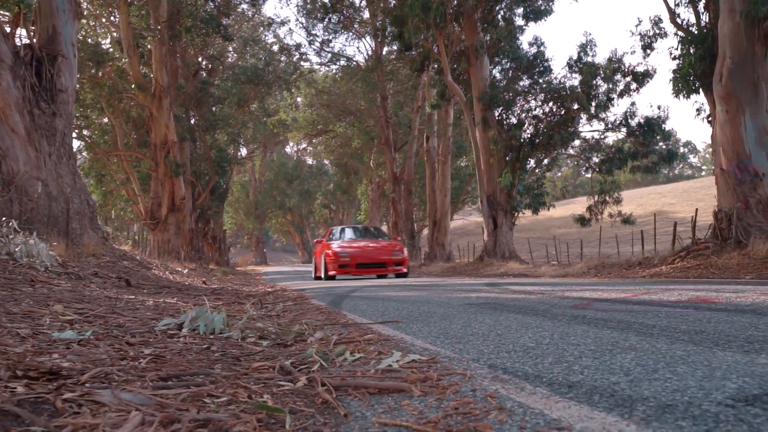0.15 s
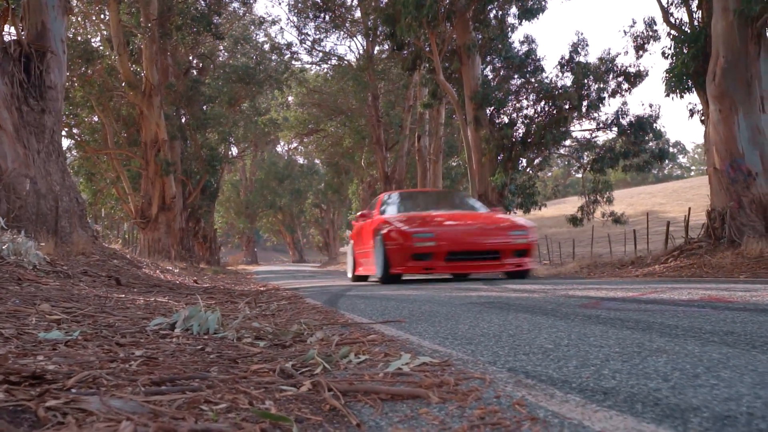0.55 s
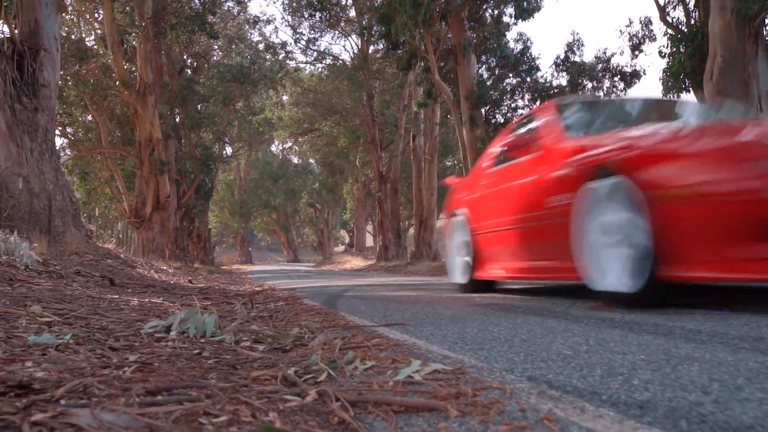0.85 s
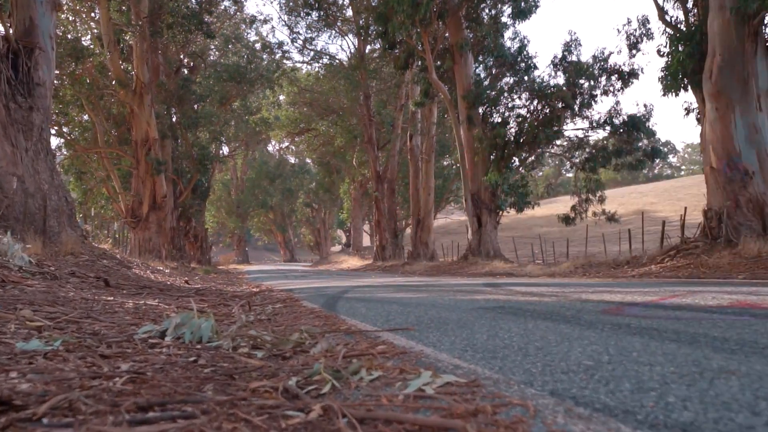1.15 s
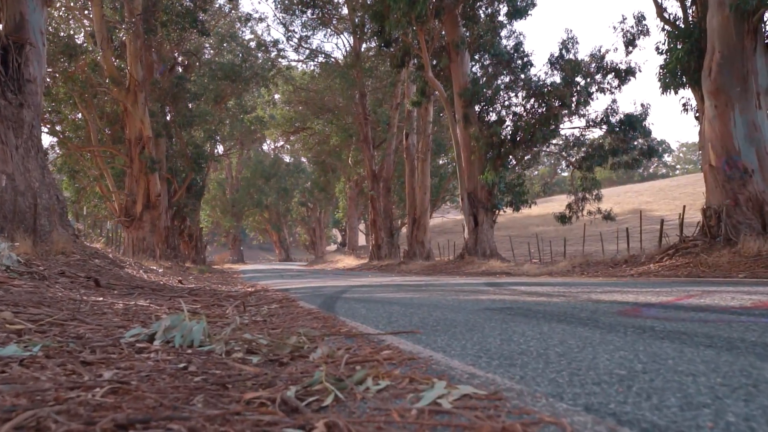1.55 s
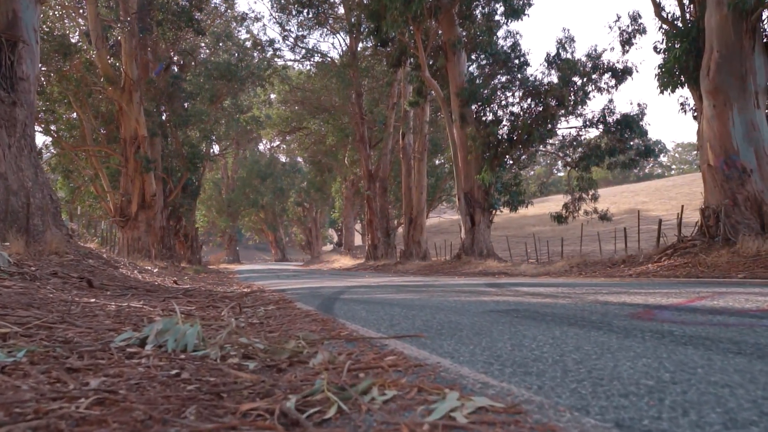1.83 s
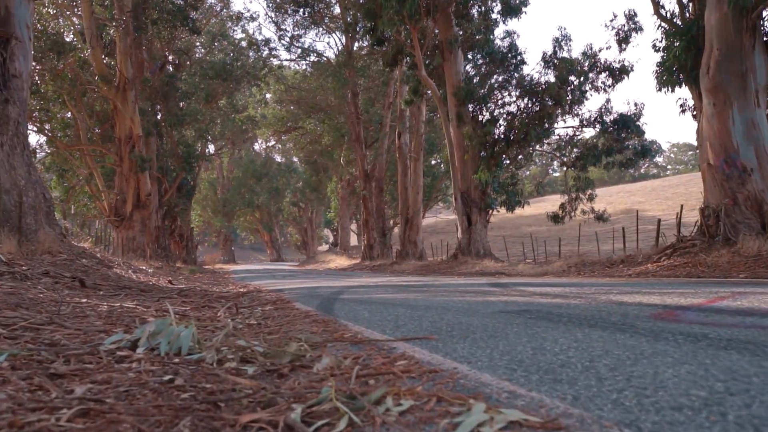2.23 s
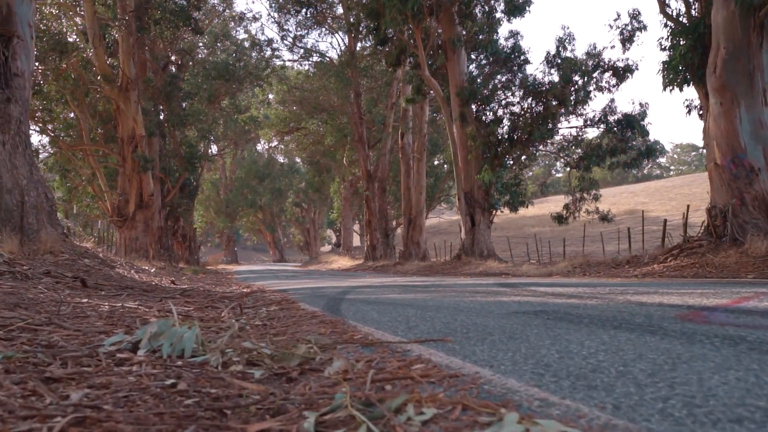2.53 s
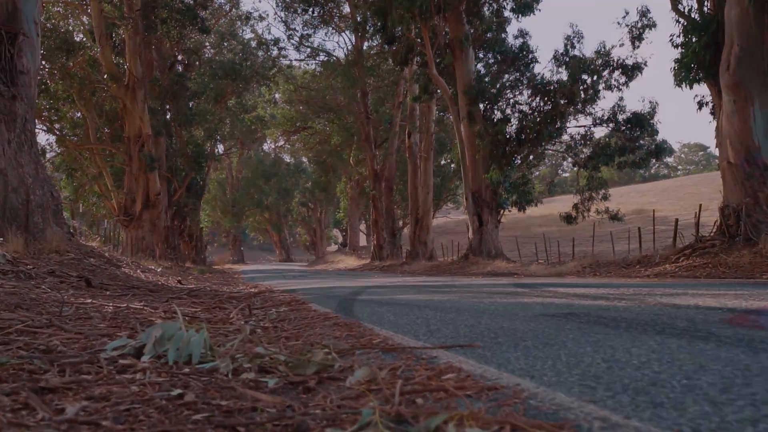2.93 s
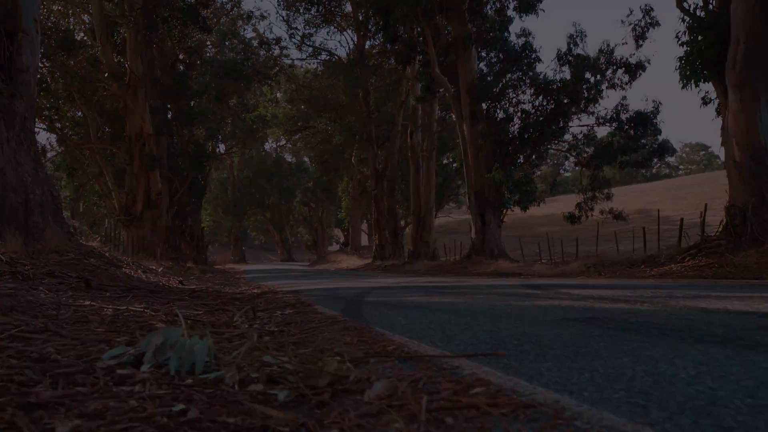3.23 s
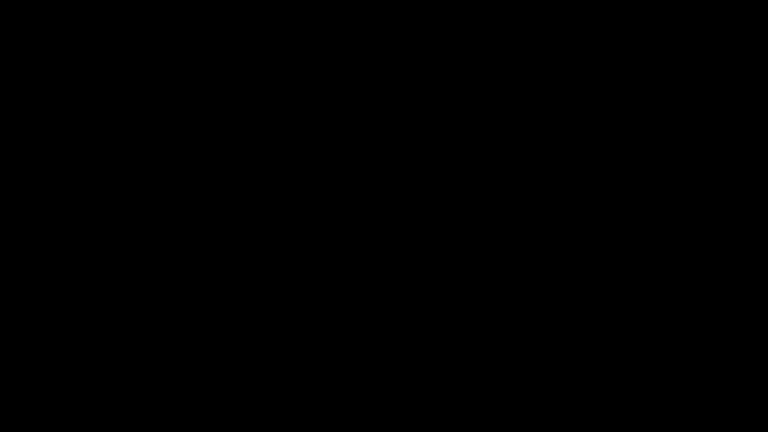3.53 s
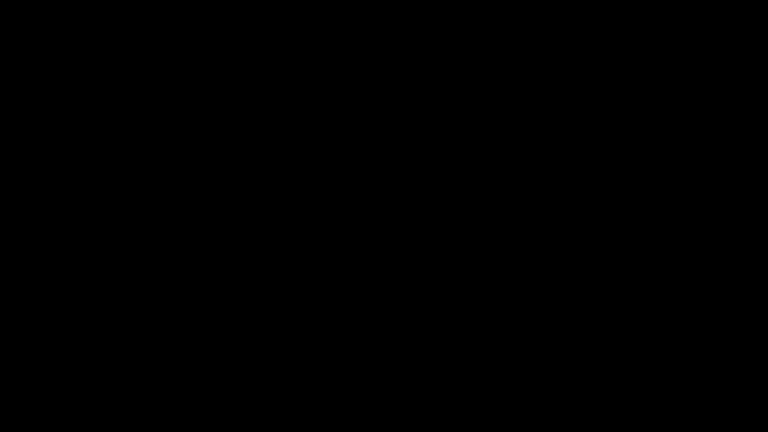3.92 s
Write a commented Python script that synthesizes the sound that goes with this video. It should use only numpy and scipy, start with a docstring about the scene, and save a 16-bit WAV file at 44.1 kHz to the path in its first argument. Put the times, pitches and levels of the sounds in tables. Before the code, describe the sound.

Stereo microphones low on a leafy verge catch a car speeding by: pulsing low exhaust, ringing tread noise and a burst of bright tyre hiss at the pass. The raspy exhaust follows, echoing among trunks, until the throttle closes near two seconds and it becomes softer and duller. Irregular wind buffets bump the microphones, strongest near three seconds, before near quiet.

```python
"""On the verge of a tree-lined country road, a rotary-engined sports car passes and eases off into the distance.
The exhaust is built from sine drones, a pulse-like stack of orders and puffs of noise, echoed by the trunks.
The tyres are coloured noise: a roar with a ringing tread and a bright hiss, shaped by distance.
Low noise rumbles with the road and the wake; noise gusts and thumps are air striking each microphone.
Leaves crackle in flurries, chips of grit tick, and a faint noise bed is the still air."""
import sys
import numpy as np
from scipy import signal
from scipy.fft import rfft, irfft
from scipy.io import wavfile
from scipy.ndimage import uniform_filter1d, map_coordinates

SR = 44100
rng = np.random.default_rng(int(sys.argv[2]) if len(sys.argv) > 2 else 0)


def persist_wave(psi):
    """Save psi, clipped to +-1, as 16-bit WAV."""
    counts = np.round(np.clip(psi, -1, 1) * 32767).astype(np.int16)
    wavfile.write(sys.argv[1], SR, np.atleast_2d(counts).T)


N = 179575
TIME = np.arange(N) / SR

SOUND_M_S = 343
SPEED_M_S, KERB_M = 15, 2.2  # the car's speed, and how near it comes
NOSE_S, MIDDLE_S, TAIL_S = 1.02, 1.19, 1.25  # when the front tyres, the body and the tailpipe draw level
BEND_S, BEND_DB_PER_S, BEND_LOSS_DB = 2.62, 22, 21  # far off, the car slips out of earshot round a bend

# the two rotors fire in turn; the engine pulls, holds and coasts down. Columns: time_s, firing_hz (at the car)
FIRING_RATE = [(0, 151.8), (.22, 151.7), (1.08, 166.8), (1.88, 167.2), (2.45, 157.3), (3.2, 136.6),
               (4.07, 124.4)]
# orders of the rasp; the half orders come from the two rotors being unequal.
# Columns: order (multiple of the firing rate), level_db (relative)
RASP_ORDERS = [(1.5, 1), (2.5, -6.5), (3, 5.5), (3.5, -10.5), (4, -2), (4.5, -9), (5, -2), (5.5, -12),
               (6, -2.5), (6.5, -32), (7, -8), (7.5, -31), (8, -9), (9, -32.5), (10, -33), (11.5, -29),
               (12, -13.5)]
# centre of the band of rasp reinforced by its bounce off the road. Columns: time_s, peak_hz
BOUNCE_PEAK = [(1.25, 940), (1.5, 752), (1.75, 623)]
WANDER, WANDER_PER_S = .003, 14  # share by which the firing rate wavers, and how fast


def exhaust():
    """Each firing sends a steep pressure pulse down the pipe, followed by a puff of gas."""
    receding_m_s = SPEED_M_S * (2 * behind(TAIL_S) - 1)
    doppler = 1 + receding_m_s / SOUND_M_S
    firing_hz = curves(FIRING_RATE)[0] * (1 + WANDER * walk(WANDER_PER_S)) / doppler
    drone_db, octave_db, rasp_db = exhaust_levels()
    peak_hz, = curves(BOUNCE_PEAK)
    cycle = np.cumsum(firing_hz) / SR + 0.002 * walk(140)  # no two firings are timed quite alike
    angle = 2 * np.pi * cycle

    drone = np.sqrt(2) * np.sin(angle) * undb(drone_db + 0.46 * walk(60))
    octave = np.sqrt(2) * np.sin(2 * angle) * undb(octave_db + 1.2 * walk(60))
    rasp = 0
    for order, db in RASP_ORDERS:
        lift_db = 7.6 * np.exp(-((order * firing_hz - peak_hz) / 130) ** 2)
        rasp = rasp - undb(db + lift_db) * np.cos(order * angle)  # all orders crest together in one sharp pulse
    rasp = unit(rasp) * undb(1.4 * walk(150))

    puffs = unit(np.exp(-(cycle % 1) / 0.42) * rng.standard_normal(N))
    gas = colour(puffs, [(500, -15.5), (1000, -2.5), (1400, -5.0), (2400, 0.0), (3300, -16), (6000, -26.5)])[0]
    overtones = octave + (rasp + undb(-13.5) * gas) * undb(rasp_db)

    # on the approach the tailpipe faces away, so more of its rasp arrives by way of the nearest trunks
    echo_db = np.interp(TIME, [1.0, 1.25], [-4, -22])
    near_echo = trees(overtones * undb(echo_db), t60=0.63)
    # the boom lingers longer in the avenue
    avenue_echo = undb(-15.5) * trees(drone, t60=0.69)
    return drone + overtones * panned(-2.5 / distance(TAIL_S)) + near_echo + avenue_echo


# boom of the tailpipe at the firing rate, before the dips and the beat; near 3.77 s a wind buffet
# swells the same band. Columns: time_s, level_db
BOOM = [(1.06, -8), (1.2, -12.5), (1.52, -9), (1.79, -18), (1.88, -24.5), (1.99, -19), (2.07, -23),
        (2.38, -23.5), (2.73, -16), (2.86, -28), (2.98, -24), (3.73, -49.5), (3.77, -40), (4.07, -42)]
APPROACH_DB, SWELL_S, SWELL_DB = -3, 0.16, 9  # the boom's trim on the approach, and its opening swell
BEAT_HZ, BEAT_CREST_S, BEAT_DB = 9.71, 0.4184, -9.5  # an echo with another Doppler shift beats against it
LIFT_S, LIFT_LENGTH_S = 1.895, 0.0097  # the driver lifts off the throttle


def exhaust_levels():
    """Boom, octave and rasp in dB: each dips as the car draws level; closing the throttle cuts the overtones."""
    closed = .5 + .5 * np.tanh((TIME - LIFT_S) / LIFT_LENGTH_S)
    ahead = 1 - behind(NOSE_S)
    beat = np.abs(1 + ahead * undb(BEAT_DB) * np.exp(2j * np.pi * BEAT_HZ * (TIME - BEAT_CREST_S)))

    drone_db = curves(BOOM)[0] + APPROACH_DB * ahead + 20 * np.log10(beat)
    drone_db = drone_db - SWELL_DB * np.maximum(1 - TIME / SWELL_S, 0)
    drone_db = drone_db - 12 * around(.96, width_s=0.069) - 13 * around(LIFT_S, width_s=0.013)

    octave_db = -14.0 + passing_db(TAIL_S, falloff=0.55, rear_db=-1.4) - 18 * closed
    octave_db = octave_db - 22 * around(1.045, width_s=0.071)
    octave_db = octave_db - 8 * np.maximum(1 - TIME / 1.07, 0)  # it builds as the throttle opens

    rasp_db = -20.5 + passing_db(TAIL_S, falloff=0.94, rear_db=4.0) - 8.7 * closed
    rasp_db = rasp_db - 10 * around(1.143, width_s=.06)
    return drone_db, octave_db, rasp_db


# colour of the tread roar. Columns: pitch_hz, level_db (relative)
ROAR_COLOUR = [(200, 3), (280, -3.5), (420, -3), (580, -7), (740, -6), (950, -6), (1200, -5), (1500, -7.5),
               (1900, -10), (2200, -15.5), (2750, -17.5), (3400, -25.5), (6000, -35.5), (15000, -68.5)]
# colour of the bright tyre hiss. Columns: pitch_hz, level_db (relative)
TYRE_HISS_COLOUR = [(1500, 14), (3000, 12), (4500, 8), (6500, 4), (9000, 1), (12000, -5), (15500, -10.5)]
# air ringing in the tread grooves, masked while the car is alongside. Columns: time_s, level_db (beside the roar)
GROOVE_RING = [(0, -6.5), (.7, -11), (.92, -8), (1.15, -31), (2.1, -9)]
# the wedge between each tyre and the road beams its roar at the listener. Columns: crest_s, boost_db
TYRE_HORNS = [(.96, 3), (1.121, 6)]
AIR_LOSS_DB_PER_M = 0.24  # the tyres sound duller as they move off, the air absorbing treble


def tyres():
    """Tread roar with a ringing groove resonance that falls at the pass, and a brighter hiss; both lean right."""
    horn_db = sum(db * around(s, width_s=0.075) for s, db in TYRE_HORNS)
    roar_db = -12.5 + passing_db(NOSE_S, falloff=0.54, rear_db=-10.0) + horn_db
    hiss_db = -29.5 + passing_db(MIDDLE_S, falloff=0.98, rear_db=-8) + 0.47 * horn_db
    nearness = 1 / distance(MIDDLE_S)

    ring_db, = curves(GROOVE_RING)
    ring = resonance(rng.standard_normal(N), hz=1207.0, width_hz=210) * undb(ring_db)
    tread = colour(stereo_noise(apart_hz=4900, side_db=-30), ROAR_COLOUR) + ring
    pitch_drop = .11 * behind(NOSE_S)
    roar = delayed(tread, np.cumsum(pitch_drop))  # a growing lag lowers the pitch

    dull = signal.sosfiltfilt(signal.butter(2, 1700, fs=SR, output="sos"), roar)
    air_loss_db = AIR_LOSS_DB_PER_M * KERB_M * distance(NOSE_S) * behind(NOSE_S)
    roar = dull + (roar - dull) * undb(-air_loss_db)
    roar = roar * undb(roar_db + 1.17 * walk(70)) * panned(-5.5 * nearness)
    hiss = colour(stereo_noise(apart_hz=9000, side_db=-9.0), TYRE_HISS_COLOUR)
    hiss = hiss * undb(hiss_db) * panned(-8 * nearness)

    # just behind the car, the bounce off the road cancels a band that rises with distance
    bounce = undb(-2.5) * swell(1.34, rise_s=.09, fall_s=0.094)
    notch_hz = 3300 * distance(TAIL_S) ** .55
    direct = roar + hiss
    return (direct + bounce * delayed(direct, SR / (2 * notch_hz))) / np.hypot(1, bounce)


# colour shared by the road rumble and the wake rumble. Columns: pitch_hz, level_db (relative)
LOW_RUMBLE_COLOUR = [(20, -30), (40, -13.5), (60, -7.5), (110, -2), (200, -3), (300, -2), (600, -35.5)]
# the whole body of moving air; its level is before the rumble's own gain
WAKE_S, WAKE_RISE_S, WAKE_FALL_S, WAKE_RUMBLE_DB = 2.75, 1.05, 0.52, -40


def rumble():
    """Low road rumble while the car approaches, then the rumble of its wake, as unrelated noise on each side."""
    road_rumble = undb(-34.5) * (1 - behind(NOSE_S)) ** 2
    wake_rumble = undb(WAKE_RUMBLE_DB) * swell(WAKE_S, WAKE_RISE_S, WAKE_FALL_S)
    noise = colour(rng.standard_normal((2, N)), LOW_RUMBLE_COLOUR)
    return noise * (road_rumble + wake_rumble) * undb(11.5 + 3.8 * walk(18)) * panned(-6.5)


# gusts on the microphones: the bow wave ahead of the car, then its wake.
# Columns: crest_s, level_db (relative), left_minus_right_db, rise_s, fall_s
AIR_GUSTS = [(.95, -25.5, 0.5, 0.44, 0.097), (1.92, -27, -8, 0.037, 0.025), (2.439, -29.5, 16, 0.11, 0.053),
             (2.83, -23, -6, 0.12, 0.061), (2.98, -30.5, 8, .05, 0.071), (3.43, -34.5, 7, 0.057, 0.067),
             (3.773, -33, -27, .015, 0.016)]
# colour of the small eddies. Columns: pitch_hz, level_db (relative)
SMALL_EDDY_COLOUR = [(30, -34), (80, 2.5), (200, -0.5), (380, 1.5), (600, -6.5), (950, -26), (1500, -33),
                     (2800, -61), (5000, -53), (12000, -66.5)]
BREEZE_DB = -48  # eddies between the gusts, before flutter and panning


def gusts():
    """Small eddies flutter on each microphone separately, swelling with each gust over a faint breeze."""
    flow = undb(BREEZE_DB) * panned(-20)
    for s, db, pan_db, rise_s, fall_s in AIR_GUSTS:
        flow = flow + undb(db) * panned(pan_db) * swell(s, rise_s, fall_s)
    flutter = np.array([unit(undb(13.2 * np.tanh(walk(120) - .5))) for side in range(2)])
    return colour(flutter * flow * rng.standard_normal((2, N)), SMALL_EDDY_COLOUR)


# big eddies, most of them mainly on one microphone. Columns: start_s, level_db (relative), left_minus_right_db
BIG_EDDIES = [(2.289, -14.5, 19), (2.411, -25, -16), (2.441, -14, -23), (2.505, -17, 13),
              (2.533, -15.5, 26), (2.798, -10.5, -15), (2.817, -9.5, -28), (2.829, -10, -27),
              (2.892, -19, 4), (2.921, -15.5, 22), (2.94, -12.5, 25), (2.96, -15.5, 20.0),
              (2.973, -10.5, 0), (3.052, -19, -0.5), (3.132, -20.5, -6), (3.151, -14, -20),
              (3.164, -16, -32), (3.191, -23, 9), (3.213, -14, 0), (3.296, -23.5, 19), (3.38, -23, -27),
              (3.418, -25.5, -26), (3.466, -22, -8), (3.603, -30, 29), (3.754, -25, -17),
              (3.769, -24.5, -25), (3.855, -30.5, -13), (3.931, -31, -25)]
# colour of their thumps. Columns: pitch_hz, level_db (relative)
BUFFET_COLOUR = [(40, -8), (120, 3.5), (330, 4.5), (600, -3.5), (950, -9.5), (1500, -23), (2800, -35),
                 (5000, -56.5), (12000, -63)]


def buffets():
    """A big eddy builds up on a microphone, tugs at it once sharply and breaks up; the weaker side is a little later."""
    kick, churn = np.zeros((2, N)), np.zeros((2, N))
    for s, db, pan_db in BIG_EDDIES:
        for side, gain in enumerate(undb(db) * panned(pan_db)[:, 0]):
            crest_s = s + 0.00271 + 0.0025 * (gain < undb(db))
            kick[side, int(crest_s * SR)] -= gain
            churn[side] += gain * swell(crest_s, rise_s=0.0018, fall_s=0.0069)
    return colour(undb(8.0) * kick + undb(-4.5) * churn * rng.standard_normal((2, N)), BUFFET_COLOUR)


# flurries of dry leaves and bark stirred by the air. Columns: crest_s, level_db (relative), half_length_s
LEAF_FLURRIES = [(0, -40, 0.11), (1.391, -39, 0.056), (2.093, -59, 0.17), (2.298, -53, 0.32),
                 (2.954, -46, 0.046), (3.205, -59, 0.12), (3.645, -67.5, 0.17), (3.824, -61, 0.021),
                 (4.05, -67, 0.23)]
# colour of the crackle. Columns: pitch_hz, level_db (relative)
CRACKLE_COLOUR = [(1760, -46.5), (3000, -2.5), (5640, 0.5), (6130, -1), (7640, 0), (8350, -1),
                  (15500, -13.5)]


def leaves():
    """Dry litter on the verge crackles in the moving air: sparse clicks under smooth flurries."""
    stir = sum(undb(db) * around(s, half_s) for s, db, half_s in LEAF_FLURRIES)
    return colour(grains(per_second=3000, spread_db=6) * stir, CRACKLE_COLOUR)


# grit and bark chips landing near the listener. Columns: start_s, level_db (relative), left_minus_right_db
CHIPS = [(0.1505, -30.5, 1), (0.4876, -26.5, -15), (0.4974, -14.5, -7), (0.506, -18, 0), (0.52, -13.5, -5),
         (0.7492, -20, -6), (0.984, -18.5, -13), (2.1188, -37, -17), (2.257, -35, 7), (2.312, -36, -0.5),
         (2.3428, -31, 0), (2.3642, -26, 7), (2.582, -26.5, 0.5), (2.995, -39, 2), (3.7022, -43.5, -5)]
# colour of the ticks. Columns: pitch_hz, level_db (relative)
CHIP_COLOUR = [(1500, -49), (3500, 2.5), (5500, 3), (7000, 8.5), (10000, 3), (15000, 0)]


def grit():
    """Each chip scuffs the ground with a sharp tick and skitters for a moment."""
    force = np.zeros((2, N))
    for s, db, pan_db in CHIPS:
        age = np.maximum(TIME - s - .0005, 0)
        contact = age / 0.0012
        tick = contact * np.exp(1 - contact)
        skitter = undb(-11.5) * (age > 0) * np.exp(-age / 0.014)
        force += undb(db - 6.5) * panned(pan_db) * (tick + skitter)
    return colour(force * stereo_noise(apart_hz=14100, side_db=-4) / np.sqrt(2), CHIP_COLOUR)


# colour of the still air among the trees. Columns: pitch_hz, level_db (relative)
AIR_COLOUR = [(30, 12), (150, 40), (500, -13.5), (1200, -28.5), (3000, -24.5), (8000, -55), (15000, -42.5)]


def still_air():
    """The quiet air among the trees is a steady, wide bed of mostly low noise."""
    return undb(-50.0) * colour(stereo_noise(apart_hz=3000, side_db=3.5), AIR_COLOUR)


def trees(x, t60):
    """Scattered echoes from the trunks along the road, different on each side."""
    t = TIME[:SR]
    tail = rng.standard_normal((2, SR)) * undb(-60 * t / t60) * (1 - np.exp(-t / .02))
    return signal.fftconvolve(x[None], tail / np.linalg.norm(tail[0]), axes=1)[:, :N]


def distance(passes_s):
    """Distance to a part of the car, as a multiple of its closest."""
    return np.hypot(SPEED_M_S * (TIME - passes_s) / KERB_M, 1)


def behind(passes_s):
    """Glides from 0 while a part of the car approaches to 1 once it heads away."""
    return .5 + .5 * SPEED_M_S * (TIME - passes_s) / (KERB_M * distance(passes_s))


def passing_db(passes_s, falloff, rear_db):
    """Level over the pass: spreading along the avenue, front against rear, and the bend."""
    bend_db = np.clip((TIME - BEND_S) * BEND_DB_PER_S, 0, BEND_LOSS_DB)
    return -20 * falloff * np.log10(distance(passes_s)) + rear_db * behind(passes_s) - bend_db


def undb(db):
    """Decibels to gain."""
    return 10 ** (np.asarray(db) / 20)


def unit(x):
    """Scale to rms 1."""
    return x / np.sqrt(np.mean(x ** 2) + 1e-18)


def curves(rows):
    """The columns of a table of (time_s, values), joined by straight lines."""
    s, *columns = np.transpose(rows)
    return [np.interp(TIME, s, c) for c in columns]


def panned(pan_db):
    """Left and right gains for a level difference; their mean is 1."""
    gains = undb(np.array([[.5], [-.5]]) * pan_db)
    return gains / gains.mean(axis=0)


def walk(rate):
    """Random levels held 1 / rate s and slewed twice; rms 1."""
    k = max(int(SR / rate), 1)
    steps = np.repeat(rng.standard_normal(N // k + 1), k)
    return unit(uniform_filter1d(uniform_filter1d(steps, k), k)[:N])


def swell(at_s, rise_s, fall_s):
    """Gain that grows to 1 and dies away, both exponentially."""
    return np.exp(-np.maximum((at_s - TIME) / rise_s, (TIME - at_s) / fall_s))


def around(at_s, width_s):
    """A smooth bump of height 1."""
    return np.exp(-((TIME - at_s) / width_s) ** 2)


def colour(x, points, size=2048):
    """Causal minimum-phase filter with a smooth (pitch_hz, level_db) response and unit energy."""
    hz, db = np.transpose(points)
    f = np.maximum(np.fft.rfftfreq(size, 1 / SR), 1)
    octaves_outside = np.maximum(np.log2(hz[0] / f), 0) + np.maximum(np.log2(f / hz[-1]), 0)
    gain = undb(np.interp(np.log(f), np.log(hz), db) - 18 * np.minimum(octaves_outside, 4))
    cepstrum = irfft(np.log(gain))
    folded = np.r_[cepstrum[0], 2 * cepstrum[1:size // 2], np.zeros(size // 2)]
    response = irfft(np.exp(rfft(folded)))
    return signal.fftconvolve(np.atleast_2d(x), response[None] / np.linalg.norm(response), axes=1)[:, :N]


def resonance(x, hz, width_hz):
    """A steep band-pass with rms 1."""
    b, a = signal.iirpeak(hz, hz / width_hz, fs=SR)
    return unit(signal.lfilter(b, a, signal.lfilter(b, a, x)))


def stereo_noise(apart_hz, side_db):
    """Noise whose two channels share a middle; side_db sets their difference in the bass, capped at 1 higher up."""
    f = np.fft.rfftfreq(N, 1 / SR)
    share = np.minimum(undb(side_db) + (f / apart_hz) ** 2, 1)
    mid, side = rng.standard_normal((2, N))
    return mid + np.array([[1], [-1]]) * irfft(rfft(side) * share, N)


def grains(per_second, spread_db):
    """Sparse random clicks on each side, many small and a few large."""
    hit = rng.random((2, N)) < per_second / SR
    size = undb(spread_db * np.minimum(rng.exponential(size=(2, N)), 4))
    return unit(hit * size * rng.choice([-1, 1], (2, N)))


def delayed(x, lag):
    """Read each channel lag samples late; the lag may change all the time."""
    n = np.arange(N)
    return np.array([map_coordinates(side, [n - lag], order=3, mode="mirror") for side in x])


def scene():
    """The car, what it stirs up, and the quiet air behind."""
    left, right = exhaust() + tyres()
    lag = -.7 + 6 / distance(TAIL_S) + 2.7 * behind(NOSE_S)  # samples by which the left side hears the car later
    car = np.vstack([delayed([left], lag), right])
    return car + rumble() + gusts() + buffets() + leaves() + grit() + still_air()


TOP_HZ = 15900


def record(dry):
    """The microphones' output stage rounds the highest peaks and cuts steeply above TOP_HZ."""
    ceiling = .92
    rounded = dry / (1 + (dry / ceiling) ** 8) ** (1 / 8)
    return signal.sosfilt(signal.ellip(10, .2, 80, TOP_HZ, fs=SR, output="sos"), rounded)


dry = scene()
out = record(dry)
persist_wave(out)
```